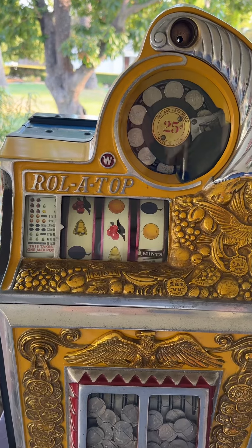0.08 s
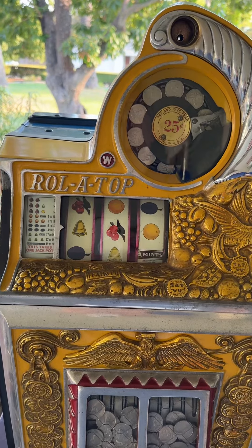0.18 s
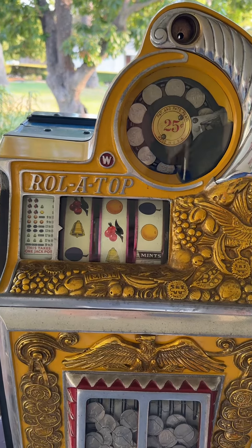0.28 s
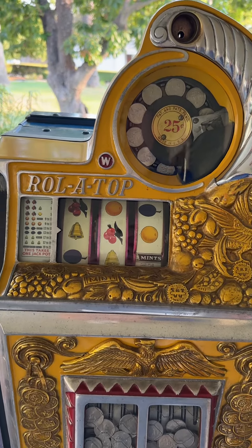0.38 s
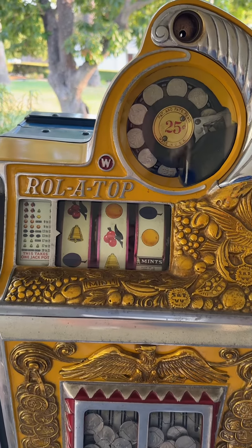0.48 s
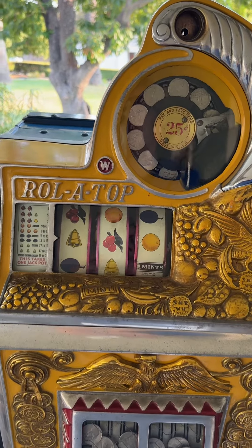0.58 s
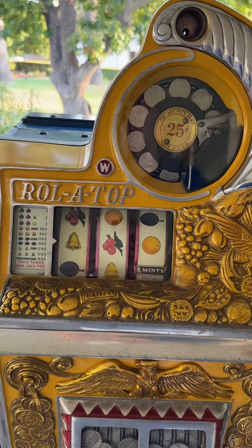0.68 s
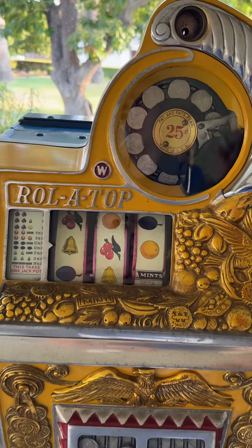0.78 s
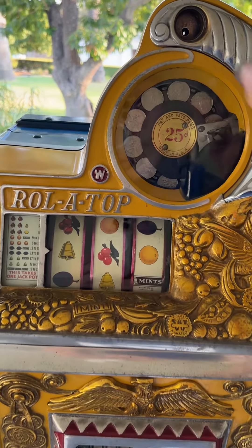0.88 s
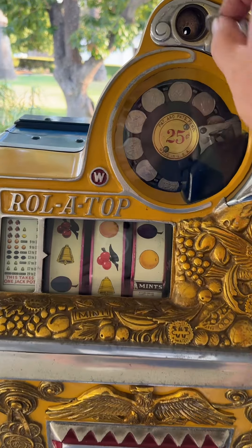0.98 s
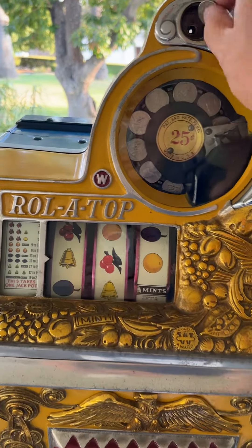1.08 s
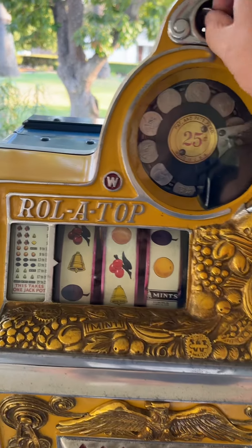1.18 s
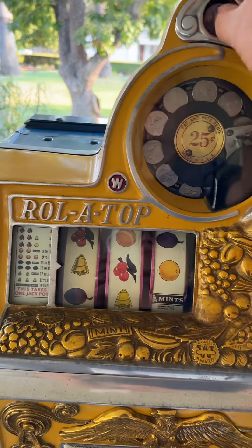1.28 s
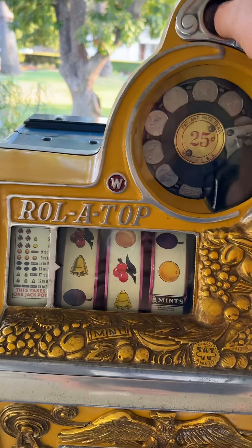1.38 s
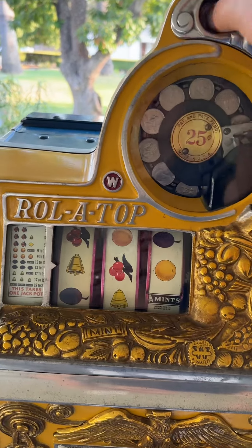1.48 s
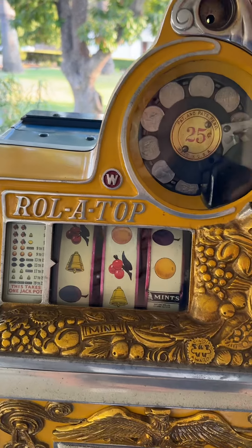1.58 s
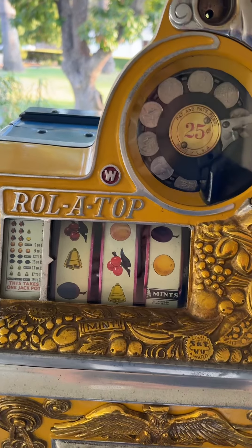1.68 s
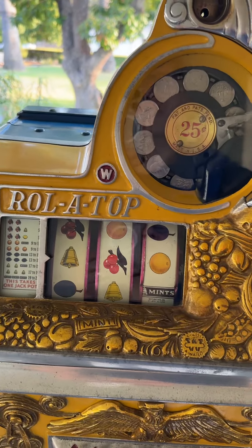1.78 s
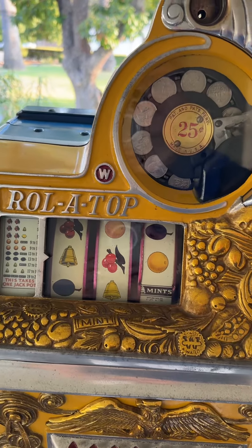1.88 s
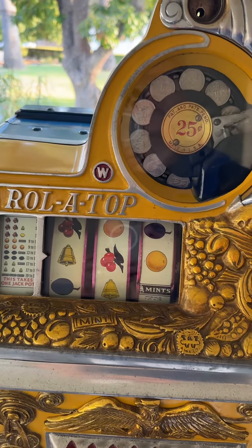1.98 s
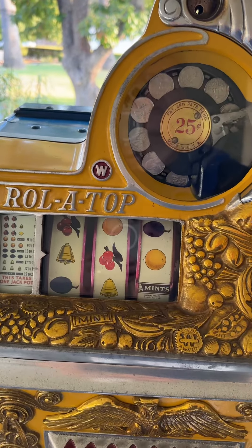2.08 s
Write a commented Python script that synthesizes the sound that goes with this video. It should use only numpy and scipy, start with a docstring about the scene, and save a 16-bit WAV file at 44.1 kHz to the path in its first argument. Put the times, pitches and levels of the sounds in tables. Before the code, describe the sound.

Old mechanical slot machine's reel slams to a stop, latch clunks, coin clinks and rattles down

```python
"""Outdoors, close to an old mechanical slot machine: light wind flutters on the microphone over a quiet hush.
The last reel stops with a rattling crash of steel levers, then a latch clunks home; both ring the cast casing,
with a low thud. A coin then clinks into the slot and rattles down its track, while a few low whumps of wind pass.
Hits are short noise bursts, ringing metal is a set of fading tones, and rumble and hush are shaped noise."""
import sys
import numpy as np
from scipy import signal
from scipy.fft import rfft, irfft, next_fast_len
from scipy.io import wavfile
from scipy.ndimage import uniform_filter1d, map_coordinates

SR = 44100
rng = np.random.default_rng(int(sys.argv[2]) if len(sys.argv) > 2 else 0)


def dump_mix(stems):
    """Bounce the given channels to the path in sys.argv[1] as a 16-bit WAV at rate SR."""
    frames = np.atleast_2d(stems).T  # one column per channel
    limited = np.clip(frames, -1, 1)  # hard clip at full scale
    pcm = np.round(limited * 32767).astype(np.int16)
    wavfile.write(sys.argv[1], SR, pcm)


N = 94815  # length of the sound in samples

# All levels are relative: the functions below mix the layers.
# blows of the reel stop: (time [s], steel clash level [dB], casing knock level [dB])
REEL_BLOWS = [(0.2139, -10, -36.5), (0.2186, -11, -30), (0.2265, -12.5, -22), (0.2317, -7, -31.5),
              (0.243, -15.5, -19), (0.25, -19.5, -14), (0.257, -22.5, -19), (0.268, -18, -19.5),
              (0.293, -21, -25), (.298, -25.5, -21.5), (0.346, -31, -44)]
# blows of the latch: (time [s], steel clash level [dB], casing knock level [dB])
LATCH_BLOWS = [(0.9914, -25, -27.5), (0.997, -12.5, -18.5), (0.9996, -10.5, -15.5), (1.011, -31, -28),
               (1.046, -23, -29)]
# places where the coin touches metal: (time [s], click level [dB], ring level [dB])
COIN_CONTACTS = [(1.2637, -25, -56.5), (1.2773, -33.5, -42), (1.2833, -22, -31.5), (1.293, -22.5, -12),
                 (1.3, -34, -19), (1.305, -28.5, -26.5), (1.3491, -32, -9.5), (1.3634, -28.5, -8),
                 (1.376, -29.5, -18.5), (1.394, -28, -27.5), (1.404, -31.5, -27), (1.4601, -37, -56.5),
                 (1.4918, -29.5, -28), (1.6168, -42.5, -47), (1.719, -28.5, -17.5), (1.7225, -25.5, -21.5),
                 (1.8219, -28, -26), (1.8282, -22.5, -26.5), (1.8561, -22, -12.5), (1.861, -27, -24.5),
                 (1.867, -27, -34.5), (1.876, -30.5, -38), (1.9118, -30.5, -42), (1.9501, -30, -55),
                 (1.9753, -39.5, -85), (2.0649, -29.5, -34), (2.0723, -27, -30), (2.0973, -34, -43.5),
                 (2.107, -31.5, -44.5), (2.1179, -34.5, -25.5), (2.1214, -26.5, -29.5),
                 (2.133, -32.5, -20.5), (2.146, -36, -33)]
# hard, dry snaps of the coin's edge: (time [s], level [dB])
COIN_SNAPS = [(1.2932, -12.5), (1.7221, -16), (1.9125, -18.5)]
# small steel parts that ring on their own: (time [s], pitch [Hz], level [dB])
SMALL_PARTS = [(.243, 1960, -17), (0.244, 2910, -19), (0.998, 2645, -32), (1.293, 3850, -32.5),
               (1.396, 5300, -34.5), (1.856, 1316, -41), (1.8556, 5140, -43), (1.9146, 7000, -36),
               (1.95, 6990, -36), (2.0963, 4500, -38), (2.1217, 3935, -33)]

# ringing tones (modes); t60 is the time to fade by 60 dB
# casing: (pitch [Hz], level under the reel stop [dB], level under the latch [dB], t60 [s])
CASING_MODES = [(137, -1, -20, .45), (206, -4, -8, .28), (235, -20, -6, .16), (277, -7, -15, .38),
                (527, -8, -6, .25), (710, -6, -13, .09), (816, -5, -3, .15), (1239, -6, 1, .14),
                (2036, -8, -15, .15), (2851, -6, -12, .08), (5329, -9, -16, .22), (5508, -1.5, -18, .11),
                (6231, -7, -15, .15), (7156, -12, -30, .25)]
# coin: (pitch [Hz], level [dB], t60 [s])
COIN_TONES = [(8802, -19, .11), (9305, -20, .11), (14896, -5, .085), (15080, -9, .04)]
# coin track: (pitch [Hz], level at the slot [dB], level down in the chute [dB], t60 [s])
TRACK_MODES = [(705, -23, -36, .09), (1330, -33, -30, .11), (2915, -40, -28, .22), (4000, -24, -26, .07),
               (5230, -22, -26, .1), (6960, -29, -20, .06)]
# fading time of the hollow cabinet: (frequency [Hz], t60 [s])
CABINET_T60 = [(200, 0.96), (1000, 0.49), (3000, 0.45), (7000, 0.39), (10000, 0.37), (15000, 0.14)]

# colour of the steel clash at the reel stop: (frequency [Hz], level per Hz [dB])
REEL_CLASH_COLOUR = [(950, -20), (1450, -6), (2300, -6), (4800, -7.5), (5500, 3.5), (7200, 1), (10000, -2),
                     (13000, -13), (15600, -14), (16300, -35)]
# colour of the latch's steel clash: (frequency [Hz], level per Hz [dB])
LATCH_CLASH_COLOUR = [(1200, -23), (2500, -4.5), (4200, -8), (5600, -2), (6400, 5), (7100, -3), (8400, 1.5),
                      (9500, -7), (12300, -3), (15600, -10.5), (16300, -34)]
# colour of the knock on the casing: (frequency [Hz], level per Hz [dB])
KNOCK_COLOUR = [(50, -21), (110, -16), (250, 5.5), (420, -3), (800, -4), (1500, -5.5), (2600, -6.5),
                (5000, -11), (12000, -40)]
# colour of the coin's clicks at the slot: (frequency [Hz], level per Hz [dB])
SLOT_CLICK_COLOUR = [(300, -51), (750, -9), (1700, -7.5), (3200, -5.5), (3900, -4), (4500, -7),
                     (5300, -2.5), (7000, -3.5), (8700, 2), (10500, -3.5), (13200, -18.5), (15000, -1),
                     (16300, -22)]
# colour of the coin's clicks in the chute: (frequency [Hz], level per Hz [dB])
CHUTE_CLICK_COLOUR = [(500, -27), (1350, -12), (2000, -12.5), (2900, -7.5), (3500, -9.5), (5300, -5),
                      (6300, -3.5), (7200, 1), (9000, 3), (10700, 0), (11700, -2.5), (13500, -7),
                      (15200, -0.5), (16300, -18)]

# level of the low rumble: wind, and the casing's low thud at 0.27 and 1.03 s: (time [s], level [dB])
LOW_RUMBLE_LEVEL = [(0, -35), (.22, -51), (.27, -26.5), (.36, -40), (.55, -42), (.9, -47.5), (.95, -39),
                    (1.03, -22.5), (1.1, -28.5), (1.15, -37.5), (1.18, -27.5), (1.33, -30.5), (1.39, -25.5),
                    (1.63, -25.5), (1.7, -42.5), (1.96, -37), (2.0, -49.5), (2.05, -39), (2.15, -68)]
# colour of the low rumble: (frequency [Hz], level per Hz [dB])
RUMBLE_COLOUR = [(15, -44.5), (30, -10), (48, 0), (80, 1), (115, -9), (200, -18.5), (330, -29.5),
                 (600, -60.5), (2000, -60.5)]
# eddies at the microphone: (time [s], level [dB], start pitch [Hz], end pitch [Hz], length [s])
WIND_EDDIES = [(1.476, -28.5, 632, 126, 0.015), (1.506, -19.5, 207, 96, 0.013), (1.535, -18, 84, 67, 0.02),
               (1.645, -12.5, 118.5, 65.8, 0.022), (1.956, -27.5, 252, 85.4, 0.011),
               (2.03, -32, 319, 59, 0.015)]
# colour of the outdoor hush: (frequency [Hz], level per Hz [dB])
HUSH_COLOUR = [(50, -8.5), (135, 0), (300, -10), (700, -19.5), (1500, -25), (3000, -32.5), (5000, -42),
               (7000, -40.5), (11000, -64.5), (15000, -72)]

# how alike left and right are: (frequency [Hz], likeness [0 to 1])
LIKENESS = [(60, .975), (150, .94), (1000, .92), (1800, .75), (2600, .4), (3900, .85), (4800, .3),
            (6200, .93), (9200, .85), (13000, .93)]
# how far left leads right: (frequency [Hz], phase [radians])
LEFT_LEAD = [(100, 0), (4000, -.05), (6800, -.12), (9000, -1.45), (11700, -3.0), (14000, -3.2),
             (15200, -3.9)]
# left level minus right level: (frequency [Hz], difference [dB])
LEFT_BALANCE = [(350, 0.5), (700, -7.5), (1200, -6), (2000, 0.5), (2600, 1), (4000, 0)]

LATE_BLOWS_S, LOW_PASS_HZ = .253, 10500  # from this time the reel stop's clashes are low-passed at 10.5 kHz
CHUTE_S = 1.7  # when the coin leaves the slot for the chute
RIPPLE_DB, RIPPLE_WIDTH_HZ = 3.8, 210  # unevenness of each contact's resonances
BLOW_SCATTER_DB = 2.5  # how differently each blow excites a mode
ROUGH, FLUTTER_RATE = .4, 90  # depth and knots per second of a ringing part's flutter
PING_T60_S, PING_ATTACK_S = .075, 0.0012
HUSH_DB = -46
TOP_HZ = 16600  # highest frequency kept


def reel_stop():
    """Steel levers slam and chatter against the casing."""
    s, clash_db, knock_db = np.transpose(REEL_BLOWS)
    late = s > LATE_BLOWS_S
    early_clash = bursts(s[~late], clash_db[~late], REEL_CLASH_COLOUR, attack=0.0011, t60=0.055)
    late_clash = bursts(s[late], clash_db[late], REEL_CLASH_COLOUR, attack=0.0011, t60=0.055)
    knocks = bursts(s, knock_db, KNOCK_COLOUR, attack=.001, t60=0.062)
    hits = early_clash + low_pass(late_clash, LOW_PASS_HZ) + knocks
    modes = [(hz, db, t60) for hz, db, _, t60 in CASING_MODES]
    casing = ring(s, knock_db, modes, attack=0.0017)
    return hits + amp(-11.5) * low_pass(cabinet(hits), LOW_PASS_HZ) + amp(-11.5) * casing


def latch():
    """The latch drops home with a hard clunk and rebounds, and its blows set the casing ringing."""
    s, clash_db, knock_db = np.transpose(LATCH_BLOWS)
    clash = bursts(s, clash_db, LATCH_CLASH_COLOUR, attack=0.0014, t60=0.036)
    hits = clash + bursts(s, knock_db, KNOCK_COLOUR, attack=0.0008, t60=0.078)
    modes = [(hz, db, t60) for hz, _, db, t60 in CASING_MODES]
    casing = ring(s, knock_db, modes, attack=0.00027)
    return hits + amp(-12.5) * cabinet(hits) + amp(-10.5) * casing


def coin():
    """The coin cracks, clicks and rings thinly; first the slot answers, then the chute below it."""
    s, click_db, ring_db = np.transpose(COIN_CONTACTS)
    out = ring(s, ring_db, COIN_TONES, attack=.0004)
    out += bursts(*np.transpose(COIN_SNAPS), CHUTE_CLICK_COLOUR, attack=0.0011, t60=.016)
    slot_modes = [(hz, db, t60) for hz, db, _, t60 in TRACK_MODES]
    chute_modes = [(hz, db, t60) for hz, _, db, t60 in TRACK_MODES]
    places = [(s < CHUTE_S, SLOT_CLICK_COLOUR, slot_modes), (s >= CHUTE_S, CHUTE_CLICK_COLOUR, chute_modes)]
    for here, colour, modes in places:
        clicks = bursts(s[here], click_db[here], colour, attack=0.00072, t60=0.05)
        # a louder, much shorter layer sharpens each click
        clicks += amp(6.5) * bursts(s[here], click_db[here], colour, attack=0.0012, t60=0.0096)
        track = ring(s[here], click_db[here], modes, attack=0.0032)
        out += clicks + amp(-14.0) * cabinet(clicks) + track
    return out


def pings():
    """Some contacts catch a single lever or guide, which rings briefly at its own pitch."""
    t, out = np.arange(N) / SR, np.zeros((2, N))
    for s, hz, db in SMALL_PARTS:
        age = np.maximum(t - s, 0)
        attack = 1 - np.exp(-age / PING_ATTACK_S)
        out[0] += amp(db - 60 * age / PING_T60_S) * attack * tone(hz, ROUGH).real
    return out


def low_rumble():
    """Low noise carries the wind and the casing's low thuds; eddies add short whumps of falling pitch."""
    t = np.arange(N) / SR
    out = amp(np.interp(t, *np.transpose(LOW_RUMBLE_LEVEL))) * noise(RUMBLE_COLOUR)
    for s, db, start_hz, end_hz, length in WIND_EDDIES:
        u = np.clip((t - s) / length, 0, 8)  # age of the eddy, counted in its own lengths
        hz = end_hz + (start_hz - end_hz) * np.exp(-2 * u)
        swell = 3 * u * np.exp(1 - 3 * u)
        cycles = np.cumsum(hz * (t > s)) / SR + rng.random()
        out[0] += amp(db) * swell * np.sin(2 * np.pi * cycles)
    return out


def outdoors():
    """A quiet, steady outdoor hush made of soft noise with little treble."""
    return amp(HUSH_DB) * noise(HUSH_COLOUR)


def bursts(times, levels, spectrum, attack, t60):
    """Each contact excites its own uneven cluster of quickly damped resonances."""
    t, out = np.arange(SR // 5) / SR, np.zeros((2, N + SR))
    hz = np.fft.rfftfreq(len(t), 1 / SR)
    envelope = (1 - np.exp(-t / attack)) * amp(-60 * t / t60)
    for s, db in zip(times, levels):
        knots = rng.standard_normal(int(SR / RIPPLE_WIDTH_HZ))
        ripple = map_coordinates(knots, [hz / RIPPLE_WIDTH_HZ])
        colour = amp(along(spectrum, hz) + RIPPLE_DB * np.clip(ripple, -2, 1))
        grain = irfft(rfft(rng.standard_normal((2, len(t)))) * colour, len(t))
        start = round(s * SR)
        out[:, start:start + len(t)] += amp(db) * envelope * unit(grain)
    return out[:, :N]


def ring(times, levels, modes, attack):
    """Each blow feeds every mode a different share of energy and knocks its phase askew."""
    t, out = np.arange(N) / SR, np.zeros(N)
    blow = np.searchsorted(np.sort(times), t)  # how many blows have landed so far
    places = np.round(times * SR).astype(int)
    rise = np.exp(-1 / (attack * SR))
    for hz, db, t60 in modes:
        share, kick = rng.standard_normal((2, len(times)))
        gain = amp(levels + BLOW_SCATTER_DB * np.clip(share, -2, 1))
        energy = np.bincount(places, gain ** 2, minlength=N)[:N]
        fall = np.exp(-2 * np.log(1000) / (t60 * SR))
        # each packet of energy swells in, then dies away
        power = signal.lfilter([1 - rise], [1, -rise - fall, rise * fall], energy)
        phase = np.append(0, np.cumsum(.5 * kick))[blow]
        phase = uniform_filter1d(phase, size=40)  # soften the jumps
        out += amp(db) * np.sqrt(np.abs(power)) * np.real(tone(hz, ROUGH) * np.exp(1j * phase))
    return np.array([out, np.zeros(N)])  # no second, unrelated signal


def tone(hz, rough):
    """A resonance of rms near 1 that flutters in strength and phase, as loosely mounted metal does."""
    flutter = 1 + rough * (wobble(FLUTTER_RATE) + 1j * wobble(FLUTTER_RATE))
    cycles = hz * np.arange(N) / SR + rng.random()
    return np.sqrt(2) * flutter / unit_size(flutter) * np.exp(2j * np.pi * cycles)


def cabinet(x):
    """The hollow metal cabinet rings on as fading noise, with the treble dying first."""
    hz, t, z = signal.stft(rng.standard_normal((2, SR // 2)), SR, nperseg=256)
    fade = amp(-60 * t / along(CABINET_T60, hz)[:, None])
    tail = signal.istft(z * fade, SR, nperseg=256)[1]
    return signal.fftconvolve(x, tail / np.linalg.norm(tail[0]), axes=1)[:, :N]


def low_pass(x, hz):
    """Low-pass at the given frequency."""
    return signal.sosfilt(signal.butter(8, hz, fs=SR, output="sos"), x)


def noise(spectrum):
    """Two unrelated coloured noises of rms 1."""
    white = rng.standard_normal((2, N))
    return unit(filtered(white, lambda hz: amp(along(spectrum, hz))))


def wobble(rate):
    """A smooth random curve, rate knots a second."""
    knots = rng.standard_normal(int(N * rate / SR) + 4)
    return map_coordinates(knots, [np.arange(N) * rate / SR])


def filtered(x, response):
    """Reshape x with a response given for each frequency."""
    m = next_fast_len(N + SR // 2)
    return irfft(rfft(x, m) * response(np.fft.rfftfreq(m, 1 / SR)), m)[..., :N]


def along(points, hz):
    """Read a (frequency [Hz], value) table on a log frequency axis."""
    f, v = np.transpose(points)
    return np.interp(np.log(hz + 1), np.log(f + 1), v)


def amp(db):
    """Turn decibels into gain."""
    return 10 ** (np.asarray(db) / 20)


def unit(x):
    """Scale to rms 1."""
    return x / unit_size(x)


def unit_size(x):
    """The rms (average strength) of a real or complex signal."""
    return np.sqrt(np.mean(np.abs(x) ** 2) + 1e-20)


def scene():
    """Add all sources and spread them over the two microphone ports."""
    pair = reel_stop() + latch() + coin() + pings() + low_rumble() + outdoors()

    def mid_and_side(hz):
        """Share the two signals between what the ports have in common and how they differ."""
        turn = np.arccos(along(LIKENESS, hz)) / 2
        return np.array([np.cos(turn), np.sin(turn)])

    def left_and_right(hz):
        """Give each port half of the level difference and half of the phase lead."""
        half = np.array([[.5], [-.5]])
        return amp(half * along(LEFT_BALANCE, hz)) * np.exp(1j * half * along(LEFT_LEAD, hz))

    mid, side = filtered(pair, mid_and_side)
    return filtered(np.array([mid + side, mid - side]), left_and_right)


def record(dry):
    """Keep only what lies below the band limit."""
    return filtered(dry, lambda hz: hz < TOP_HZ)


dry = scene()
out = record(dry)
dump_mix(out)
```